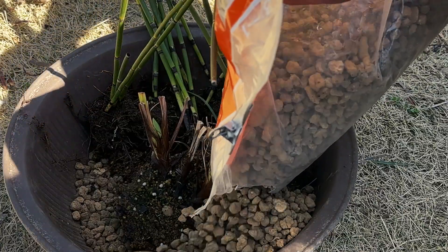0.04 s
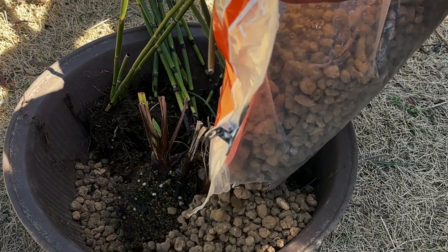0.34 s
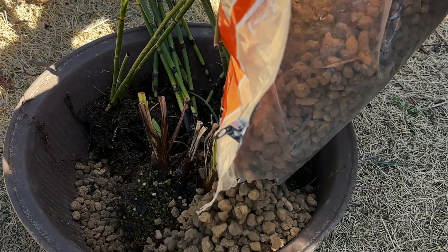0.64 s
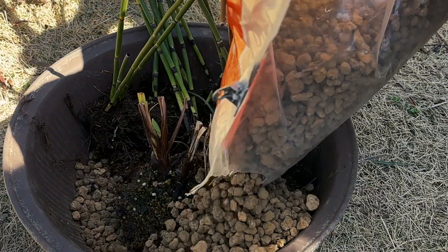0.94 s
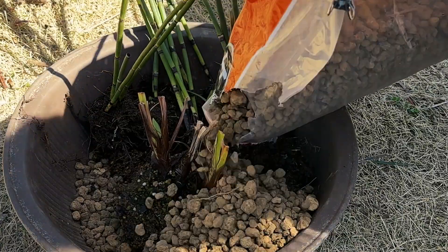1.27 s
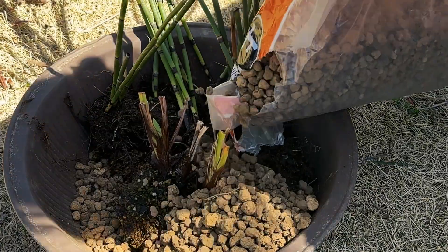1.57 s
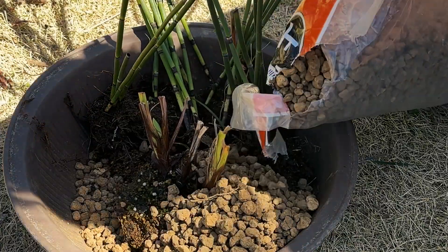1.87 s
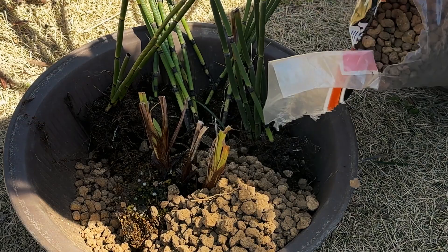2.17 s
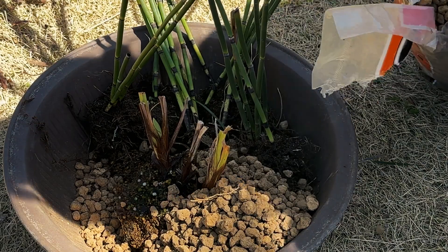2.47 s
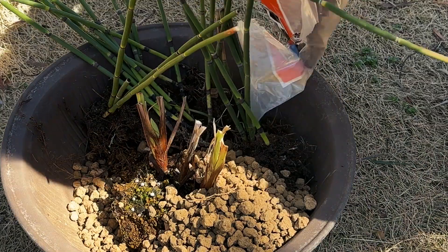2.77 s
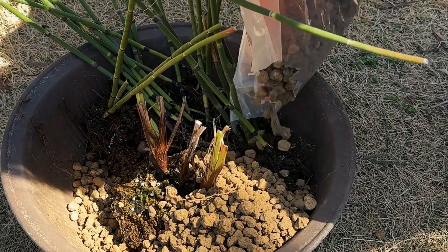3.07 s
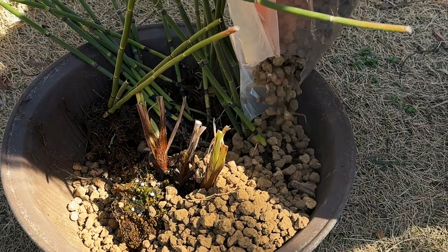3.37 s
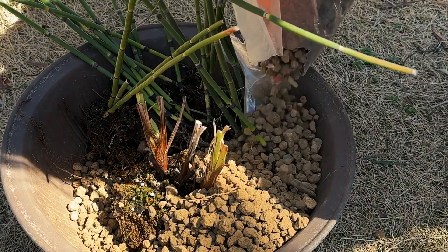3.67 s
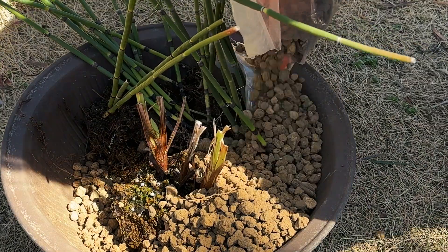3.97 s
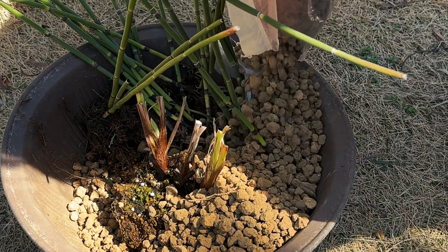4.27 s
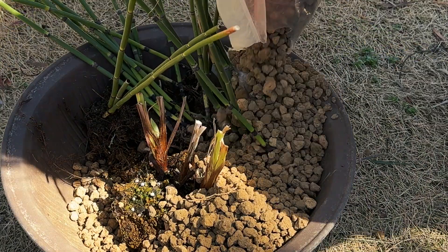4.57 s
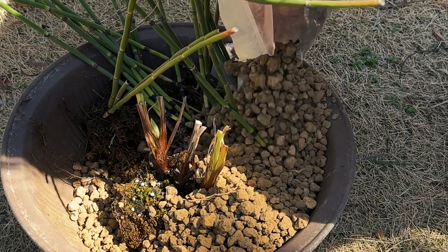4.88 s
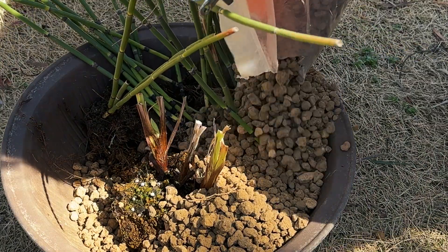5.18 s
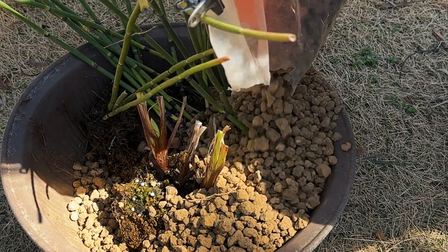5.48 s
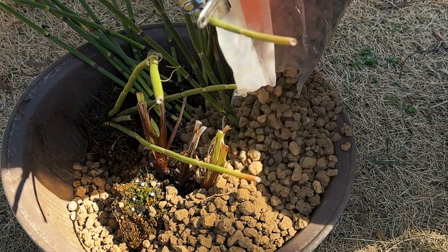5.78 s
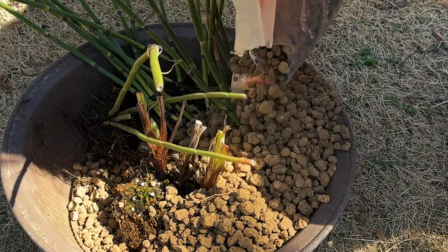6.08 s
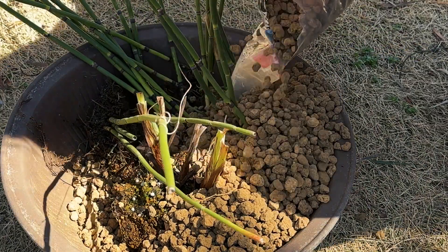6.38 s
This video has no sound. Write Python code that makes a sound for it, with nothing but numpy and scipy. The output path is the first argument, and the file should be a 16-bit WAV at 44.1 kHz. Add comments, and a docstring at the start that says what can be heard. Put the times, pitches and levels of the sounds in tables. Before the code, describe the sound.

Dry clay granules are poured from a plastic bag into a large flower pot, outdoors, close to the microphone. During the first second there is only a light trickle, with a few separate knocks and crinkles. From about 1.1 to 1.7 seconds handfuls tumble out, clacking sharply while the bag snaps and scrunches. Smaller rattling spills and crackles follow until 2.7 seconds. At 2.8 seconds a load drops at once, thudding softly on soil, and continues as a steady, fluttering patter on the growing heap, with faint hissing grit and tiny ringing grazes. The knocking turns hollower around 4 seconds. From about 5 seconds the stream thins to small clinks, with a very faint scrape of a plant stem on the bag and a crinkle near 5.6 seconds. Stray granules click until about 6.5 seconds. A light breeze rumbles softly on the microphone underneath.

```python
"""Baked clay granules pour from a plastic bag into a big flower pot, outdoors, close to the microphone.
Each impact excites a damped vibration: granules clack together, thud on bare soil, then patter on the
growing heap, and the pot scatters the sound. The bag snaps and crinkles as its creases buckle.
Friction makes grit hiss down the film and a stem scrape along it; a few granules graze a ringing edge.
Behind it all a light breeze sways on the microphone."""
import sys
import numpy as np
from scipy import signal
from scipy.fft import rfft, irfft, next_fast_len
from scipy.io import wavfile
from scipy.ndimage import uniform_filter1d

SR = 44100
rng = np.random.default_rng(int(sys.argv[2]) if len(sys.argv) > 2 else 0)


def store_wav(level_fs):
    """Save 16-bit WAV to argv[1]."""
    pcm = np.round(np.clip(np.atleast_2d(level_fs), -1, 1) * 32767)
    wavfile.write(sys.argv[1], SR, pcm.T.astype(np.int16))


N = 287973
TOP_HZ = 16200

# Spectra of impacts on soil, on the heap, on clay and of grit: (frequency [Hz], level [dB])
SOIL_SPECTRUM = [(40, -3), (120, -3.5), (220, -4), (400, 0.5), (600, 4), (1000, 0.5), (3000, -39)]
HEAP_SPECTRUM = [(250, -22), (470, -11), (590, 0), (690, -3), (870, 1), (1010, -4), (1170, -13),
                 (1400, -12), (2500, -20), (6000, -40)]
CLAY_SPECTRUM = [(400, -18), (1100, -7), (1400, -1), (1900, -3), (2650, 0), (3200, -4), (4700, -5),
                 (5400, -11), (12000, -26)]
GRIT_SPECTRUM = [(2000, -6), (3600, 2.5), (4600, 0), (5400, -3.5), (6700, 1.5), (8000, -1), (10500, -0.5),
                 (12500, -4), (16000, -31)]
# Gain of each impact sound relative to the flow:
# (in a spill [dB], poured on soil [dB], poured on the heap [dB], weight of hardness [ratio])
THUD_MIX = (0.46, 3.7, -11, -6)
KNOCK_MIX = (-3, -7, -5, -4.5)
CLACK_MIX = (0.57, 0.13, -1.3, 0.76)
TICK_MIX = (-13, -11.5, -7.5, 3)
HOLLOW_DB, HOLLOW_S, HOLLOW_WIDTH_S = 8, 4.12, 0.75  # knocks swell as the heap climbs the pot's wall
# Grit sliding down the film as the bag tilts: (time [s], duration [s], level [dB])
GRIT_SLIDES = [(0.0, 0.032, -77), (.56, 0.028, -75.5), (1.345, 0.019, -64), (2.59, 0.086, -73.5),
               (3.3, 0.12, -74), (3.48, 0.3, -77.5), (6.305, 0.02, -75)]


def granules():
    """Impact excitation: each collision gives a thud in soil, a hollow knock, a dry clack and a tick."""
    poured, cover = pour()
    levels = []
    for spill_db, soil_db, heap_db, hardness_weight in (THUD_MIX, KNOCK_MIX, CLACK_MIX, TICK_MIX):
        spill_power = amp(spill_db) ** 2 * spills(hardness_weight)
        pour_power = amp(soil_db + (heap_db - soil_db) * cover) ** 2 * poured
        levels.append(np.sqrt(spill_power + pour_power))
    thud_level, knock_level, clack_level, tick_level = levels
    hollow = amp(HOLLOW_DB * np.exp(-((np.arange(N) / SR - HOLLOW_S) / HOLLOW_WIDTH_S) ** 2))
    sliding = np.sqrt(swells(GRIT_SLIDES, attack_s=0.012, release_s=0.12) + amp(-84.5) ** 2)
    hits = collisions(spills(0), poured, spread_db=4.0, candidates=12000)
    thuds = impacts(hits, SOIL_SPECTRUM, pitch_hz=349, octaves=0.58, cycles=7.8, vary_db=2.5,
                    scatter_db=-6.5, scatter_t60=0.044, slide_db=-8, samples=700)
    knocks = impacts(hits, HEAP_SPECTRUM, pitch_hz=887, octaves=0.37, cycles=14, vary_db=5,
                     scatter_db=6, scatter_t60=0.043, slide_db=-17.5, samples=520)
    clacks = impacts(hits, CLAY_SPECTRUM, pitch_hz=2147, octaves=0.57, cycles=14.3, vary_db=2.5,
                     scatter_db=-4, scatter_t60=0.038, slide_db=-31, samples=380)
    grit = impacts(hits, GRIT_SPECTRUM, pitch_hz=7040, octaves=0.59, cycles=14, vary_db=4.5,
                   scatter_db=3, scatter_t60=0.012, slide_db=1.5, samples=150)
    rattle = in_pot(clack_level * clacks + np.hypot(tick_level, sliding) * grit, wet_db=-11, t60=0.03)
    return thud_level * thuds + knock_level * hollow * knocks + rattle


POUR_S, POUR_ATTACK_S, COVER_S = 2.79, 0.013, 0.71  # COVER_S: time scale of burying the soil
DUMP_DB, DUMP_HOLD_S, DUMP_FALL_DB_PER_S = -59, 0.18, 40  # the load at the mouth drops at once
STREAM_DB, STREAM_HOLD_S, STREAM_FALL_DB_PER_S = -68, 1.98, 8.5  # steady until the bag is eased back
CLUMP_DB = 1.33
# Flutter of the stream as granules leave in clumps: (modulation frequency [Hz], level [dB])
CLUMP_SPECTRUM = [(2, -6), (6, 0), (14, -2), (30, -14), (80, -50)]


def pour():
    """Granular flow: a dump and a stream add in power. Returns that power and the share of soil buried."""
    age = np.maximum(np.arange(N) / SR - POUR_S, 0)
    dump = amp(DUMP_DB - DUMP_FALL_DB_PER_S * np.maximum(age - DUMP_HOLD_S, 0))
    stream = amp(STREAM_DB - STREAM_FALL_DB_PER_S * np.maximum(age - STREAM_HOLD_S, 0))
    clumps = amp(CLUMP_DB * np.clip(noise(CLUMP_SPECTRUM), -2, 2))
    power = np.minimum(age / POUR_ATTACK_S, 1) ** 2 * (dump ** 2 + (clumps * stream) ** 2)
    cover = 1 - np.exp(-(age / COVER_S) ** 2)
    return power, cover


TRICKLE_DB = -82  # stray granules never quite stop
# Handfuls shaken out; positive hardness is clay on clay, negative is clay on soil:
# (time [s], duration [s], level [dB], hardness [dB])
HANDFULS = [(0.0, 0.055, -69, 0.5), (.1, 0.018, -74.5, 4), (.52, 0.056, -73, -0.5), (.97, 0.22, -76.5, -1),
            (1.07, 0.062, -78, 6), (1.119, 0.069, -61, 0), (1.214, 0.13, -63.5, 0), (1.346, 0.1, -63, -0.3),
            (1.494, 0.034, -61.5, -0.2), (1.575, 0.0095, -66, 0), (1.65, 0.027, -78.5, -2),
            (1.746, 0.017, -69, -1), (1.806, 0.04, -70, -0.5), (1.885, 0.095, -72, 0),
            (2.029, 0.034, -68, 0.5), (2.1, 0.098, -68, -0.1), (2.21, 0.055, -67, -0.5),
            (2.345, 0.039, -77, -2.5), (2.43, 0.075, -74, -1), (2.525, 0.072, -64.5, 0.2),
            (2.645, 0.044, -63.5, 1.5), (3.28, 0.019, -65, 0), (3.365, 0.054, -65, 0),
            (3.67, 0.095, -67.5, 1), (6.05, 0.031, -79, -0.5), (6.425, 0.043, -72.5, -0.5)]


def spills(hardness_weight):
    """Incoherent addition: the powers of the handfuls and of a steady trickle sum."""
    rows = [(s, length, db + hardness_weight * hard_db) for s, length, db, hard_db in HANDFULS]
    return swells(rows, attack_s=0.0092, release_s=0.19) + amp(TRICKLE_DB) ** 2


SPILL_HITS_PER_S, POUR_HITS_PER_S, REFERENCE_FLOW_DB, RATE_DOUBLES_DB = 600, 750, -68, 6


def collisions(spilled, poured, spread_db, candidates):
    """Poisson process: more flow brings more collisions, each carrying a smaller share of it."""
    flow = spilled + poured
    base_rate = (SPILL_HITS_PER_S * spilled + POUR_HITS_PER_S * poured) / flow
    rate = base_rate * 2 ** ((10 * np.log10(flow) - REFERENCE_FLOW_DB) / RATE_DOUBLES_DB)
    when = rng.integers(0, N, candidates)
    happens = rng.random(candidates) < rate[when] * N / SR / candidates
    strength = amp(spread_db * np.clip(rng.standard_normal(candidates), -2, 2))
    return when, happens * strength / np.sqrt(rate[when])


def impacts(hits, spectrum, pitch_hz, octaves, cycles, vary_db, scatter_db, scatter_t60, slide_db,
            samples):
    """Superposition: damped rings, their scatter around the pot and sliding noise sum to an rms of 1."""
    when, strength = hits
    heard = strength > 0
    pitch, share, sign = np.clip(rng.standard_normal((len(when), 3)), -2, 2)[heard].T
    when, strength = when[heard], strength[heard] * amp(vary_db * share) * np.sign(sign)
    t = np.arange(samples) / SR
    hz = np.minimum(pitch_hz * 2 ** (octaves * pitch), TOP_HZ)[:, None]
    each_ring = strength[:, None] * np.sin(2 * np.pi * hz * t) * decay(t, cycles / hz)
    rings = np.bincount((when[:, None] + np.arange(samples)).ravel(), each_ring.ravel(), N)[:N]
    energy_decay = decay(np.arange(SR // 20) / SR, scatter_t60) ** 2
    energy = signal.fftconvolve(np.bincount(when, strength ** 2, N), energy_decay)[:N]
    scatter = unit(np.sqrt(np.abs(energy)) * rng.standard_normal(N))
    stream = unit(coloured(rings, spectrum)) + amp(scatter_db) * unit(coloured(scatter, spectrum))
    stream += amp(slide_db) * noise(spectrum)
    # the power is held even over longer stretches
    power = uniform_filter1d(uniform_filter1d(stream ** 2, size=1500), size=1500)
    return stream / np.sqrt(np.abs(power) + 1e-12)


def in_pot(x, wet_db, t60):
    """Reverberation: quick reflections between the walls of the pot follow the direct sound."""
    t = np.arange(SR // 20) / SR
    out, hop = x.copy(), SR // 2
    for start in range(0, len(x), hop):  # the paths change as the bag moves
        tail = rng.standard_normal(len(t)) * decay(t, t60)
        reflections = signal.fftconvolve(x[start:start + hop], tail / np.linalg.norm(tail))
        add(out, start / SR, amp(wet_db) * reflections)
    return out


KNOCK_CYCLES, GIVE_S, SECOND_TOUCH_DB = 8.5, 0.002, -9
# Single big granules landing: (time [s], level [dB], nominal frequency [Hz])
BIG_GRANULES = [(.455, -47, 1320), (.547, -62, 844), (.739, -43.5, 1710), (1.093, -56, 686),
                (1.316, -51, 406), (1.372, -51.5, 164), (1.495, -53, 500), (1.517, -51, 1520),
                (1.535, -46, 1300), (1.659, -45, 1400), (1.894, -47, 900), (2.219, -49, 1070),
                (2.349, -47, 756), (2.354, -46.5, 1340), (2.357, -63, 487), (2.482, -66, 417),
                (2.577, -49.5, 820), (2.667, -46, 1480), (2.675, -47, 1470), (2.809, -45, 710),
                (2.845, -48, 393), (3.04, -47, 640), (3.383, -55, 795), (3.465, -51, 846),
                (3.686, -55, 780), (3.865, -51, 825), (3.978, -44.5, 910), (4.062, -57, 810),
                (4.11, -47, 880), (4.165, -48.5, 905), (4.302, -67, 820), (4.378, -56, 895),
                (4.541, -50, 875), (4.632, -49.5, 830), (5.285, -49, 1310), (6.078, -55, 870),
                (6.198, -61, 956), (6.23, -61, 398), (6.323, -63.5, 653), (6.37, -54.5, 940)]


def landings():
    """Inelastic impact: a big granule knocks twice in two modes; its rough skin crunches into the heap."""
    out, t = np.zeros(N), np.arange(SR // 25) / SR
    onset = 1 - decay(t, GIVE_S)  # porous clay gives a little first
    for s, db, hz in BIG_GRANULES:
        for delay, touch_db in ((0, 0), (rng.uniform(0.00248, 0.00497), SECOND_TOUCH_DB)):
            pitch = hz * rng.uniform(0.92, 1.08)
            knock = mode(t, pitch, KNOCK_CYCLES / pitch)
            partial = mode(t, pitch * rng.uniform(1.63, 2.1), 5 / pitch)
            add(out, s + 0.00068 + delay, amp(db + touch_db + 4.5) * onset * (knock + amp(-4) * partial))
        crunch = burst(t, CLAY_SPECTRUM, 0.02) * (1 - decay(t, 0.037))
        add(out, s - 0.002, amp(db - 17.5) * crunch)
    return in_pot(out, wet_db=-4, t60=0.029)


# Hard granules striking each other: (time [s], direct peak level [dB], frequency [Hz])
HARD_CONTACTS = [(0.947, -52, 2170), (1.0625, -46.5, 2300), (1.084, -51, 2700), (1.094, -40, 1840),
                 (1.1092, -39, 1480), (1.1344, -38, 2920), (1.217, -45, 1970), (1.3226, -37, 2610),
                 (1.351, -39, 2600), (1.368, -39, 3100), (1.379, -40.5, 2500), (1.397, -42, 1850),
                 (1.403, -40, 2700), (1.416, -40, 2370), (1.4324, -46.5, 2900), (1.4482, -40, 2880),
                 (1.459, -54, 2100), (1.937, -48.5, 1840), (2.1491, -40, 1940), (2.266, -44, 1910),
                 (2.421, -55, 1630), (2.576, -46, 2000), (2.9126, -36.5, 3230), (2.957, -42, 2600),
                 (2.976, -47, 3400), (3.041, -44.5, 2330), (3.0614, -43, 1970), (3.093, -46, 3200),
                 (3.111, -47, 2230), (3.2192, -46, 2100), (3.289, -43, 2320), (3.4655, -41.5, 2180),
                 (3.517, -49, 2060), (3.552, -47, 3500), (3.688, -47, 1780), (3.743, -46, 2710),
                 (3.919, -51, 3640), (4, -62, 1590), (4.1127, -50, 1760), (4.2446, -51, 3470),
                 (4.287, -54, 1860), (4.529, -53, 1740), (4.712, -51.5, 1700), (4.738, -49, 1460),
                 (5.08, -54, 1890), (5.287, -48, 2250), (5.424, -54, 1910), (5.53, -56, 1950),
                 (6.1317, -57, 2100), (6.1542, -60, 1820), (6.2016, -60, 2120), (6.23, -51, 2250),
                 (6.4256, -57, 2450), (6.476, -49, 1450)]


def clicks():
    """Hard impact: a brief contact gives a broadband crack and three partials that last 13 cycles."""
    out, t = np.zeros(N), np.arange(SR // 50) / SR
    for s, db, hz in HARD_CONTACTS:
        partials_hz = hz * np.array([1, rng.uniform(0.585, 0.66), rng.uniform(1.0, 1.9)])[:, None]
        ring = amp([0, -7, -5]) @ mode(t, partials_hz, 13 / partials_hz)
        crack = burst(t, [(500, -22), (2500, 5), (7000, -13), (15000, -19)], t60=0.005)
        click = ring + amp(-2) * crack
        add(out, s, amp(db) * click / np.abs(click).max())
    return in_pot(out, wet_db=-1.5, t60=0.024)


# Small, well-baked granules clinking as the stream thins: (time [s], level [dB], frequency [Hz])
SMALL_GRANULES = [(5.355, -56, 2700), (5.392, -56, 2700), (5.585, -62, 2950), (5.593, -62, 2850),
                  (5.7222, -63, 2750), (5.7492, -57, 2840), (5.8858, -69, 3090), (5.9066, -62, 3220),
                  (5.924, -64, 2710), (6.0056, -66, 2970), (6.03, -63, 3190)]


def clinks():
    """Free vibration: one clear note outlasts a higher partial and the tick of the contact."""
    out, t = np.zeros(N), np.arange(SR // 25) / SR
    onset = 1 - decay(t, 0.0033)
    for s, db, hz in SMALL_GRANULES:
        note = mode(t, hz, t60=0.024)
        partial = mode(t, hz * rng.uniform(1.16, 1.53), t60=0.013)
        tick = burst(t, CLAY_SPECTRUM, t60=0.0091)
        add(out, s, amp(db) * onset * (note + amp(0.5) * partial + tick))
    return out


# Creases of the bag snapping through: (time [s], level [dB], relative level of flap and puff [dB])
CREASE_SNAPS = [(0.0423, -52.5, -2), (0.3542, -61.5, 6), (0.4525, -42, -12), (0.7007, -53.5, -8),
                (1.1487, -41.5, -1.5), (1.2308, -36.5, -5), (1.266, -38, -9), (1.315, -40.5, -9),
                (1.3438, -38, -21), (1.3495, -34, -28), (1.3953, -35, -14), (1.412, -33, -23),
                (1.447, -40.5, -11), (1.4876, -37.5, -10), (1.6115, -31.5, -18), (1.6329, -49.5, -2.5),
                (1.8, -39.5, -9), (2.006, -53, 2.5), (2.369, -50.5, -2.5), (2.4371, -45.5, -1),
                (2.6956, -43.5, -5.5), (2.792, -47, -6), (2.8635, -39, -25), (2.9113, -38.5, -33),
                (3.932, -54, -12), (4.527, -54, -3), (5.5592, -43, -20), (6.154, -65, 0),
                (6.425, -62.5, 5.5)]
# Response of the plastic film: (frequency [Hz], gain [dB])
FILM_RESPONSE = [(100, -12.5), (1000, -1.5), (2800, 6), (5000, 4), (7000, 7), (11000, 1.5), (13500, -3.5),
                 (16000, -28)]
# Rumble of the heavy bag heaved in the hands: (time [s], duration [s], level [dB])
BAG_HEAVES = [(0.0, 0.24, -81), (1.14, 0.27, -69), (2.73, 0.22, -66), (6.05, 0.68, -74)]


def bag():
    """Snap-through buckling: a crease emits a pulse, the sheet shivers and flaps, the full bag puffs."""
    out, t = np.zeros(N), np.arange(SR // 25) / SR
    pulse_time = t / 0.000045
    pulse = (1 - pulse_time) * np.exp(-pulse_time)
    flap_spectrum = [(150, -52), (700, 10.5), (1500, -1.5), (3000, -2.5), (6000, -14.5), (15000, -57)]
    for s, db, flap_db in CREASE_SNAPS:
        shiver = rng.standard_normal(len(t)) * (decay(t, 0.0082) + amp(-15) * decay(t, 0.033))
        flap = burst(t, flap_spectrum, t60=0.023) * (1 - decay(t, 0.0022))
        puff = mode(t, 135 * amp(rng.standard_normal()), t60=0.018)
        body = flap + amp(4.5) * puff
        add(out, s + 0.001248, amp(db + 4.5) * pulse + amp(db - 11) * shiver + amp(db + flap_db) * body)
        for delay in rng.uniform(-0.00047, 0.0069, size=3):  # neighbouring creases give way too
            add(out, s + 0.0015 + delay, amp(db - 13) * pulse)
    heft = np.sqrt(swells(BAG_HEAVES, attack_s=0.028, release_s=0.86))
    rumble = noise([(30, -1), (62, 0.5), (130, -8.5), (200, -29), (400, -53)])
    return coloured(out, FILM_RESPONSE) + heft * rumble


# The film squeezed against the granules: (time [s], duration [s], level [dB])
FILM_SQUEEZES = [(1.11, .03, -65), (1.14, 0.043, -62.5), (1.316, 0.0093, -58), (1.347, .01, -57),
                 (1.366, .016, -61), (1.396, 0.019, -54), (1.453, 0.0072, -58), (1.483, 0.0053, -59),
                 (1.512, 0.0083, -55), (1.528, 0.014, -55), (1.672, 0.0087, -64.5), (1.803, 0.0052, -58),
                 (1.827, 0.025, -66), (2.04, 0.0045, -72), (2.059, 0.0065, -63.5), (2.16, 0.0075, -56),
                 (2.19, 0.0087, -59.5), (2.238, 0.0068, -57.5), (2.262, 0.0059, -61.5), (2.278, 0.016, -65),
                 (2.354, 0.0046, -60), (2.584, .005, -60), (2.665, 0.018, -59.5), (2.864, .005, -65),
                 (2.912, .005, -58), (2.955, 0.0049, -67), (2.974, 0.0045, -61), (5.56, .007, -65),
                 (6.076, .012, -67), (6.425, 0.021, -73), (6.472, .008, -80)]


def scrunches():
    """Shot noise: thousands of tiny creases a second give way and merge into a fine crackle."""
    creases = rng.standard_normal(N) * (rng.random(N) < 4000 / SR)
    spectrum = [(200, -31), (800, 2), (1500, 5), (3200, 4), (5000, -7), (10000, -18.5), (16000, -58)]
    crackle = unit(coloured(creases, spectrum))
    return np.sqrt(swells(FILM_SQUEEZES, attack_s=0.0019, release_s=0.011)) * crackle


EDGE_VARY_DB, EDGE_DETUNE = 1, 0.002  # each contact point favours other modes and shifts them a little
# Modes of a hard, ringing edge: (frequency [Hz], level [dB], 60 dB decay time [s])
EDGE_MODES = [(2700, 3.5, 0.075), (3710, 2, 0.08), (4100, -2, 0.055), (4440, -1, 0.06), (4680, 5, 0.06),
              (4770, -1, 0.045), (5570, -3, 0.06), (6290, -10, 0.06), (6530, -7, 0.05), (7410, -5, 0.05),
              (8400, -7, 0.04)]
# Granules skidding along that edge: (time [s], level [dB], duration [s])
EDGE_SKIDS = [(.01, -68.5, 0.035), (0.096, -75, 0.056), (0.189, -70, 0.017), (3.218, -54, 0.0032),
              (3.291, -62.5, 0.045), (3.34, -80.5, 1.2), (3.348, -65, 0.017), (3.399, -62, 0.013),
              (3.453, -63.5, 0.0079), (3.547, -67, 0.0079), (3.613, -66.5, 0.023), (3.733, -64.5, 0.015),
              (3.929, -62.5, 0.0045), (4.381, -61, 0.0086)]


def grazes():
    """Forced vibration: a run of tiny contacts keeps the modes of the edge ringing."""
    out, t = np.zeros(N), np.arange(SR // 8) / SR
    for s, db, length in EDGE_SKIDS:
        contacts = rng.standard_normal(2 * SR)[:int(length * SR)] ** 3
        ring = sum(amp(level + rng.normal(0, EDGE_VARY_DB)) * mode(t, hz * rng.normal(1, EDGE_DETUNE), t60)
                   for hz, level, t60 in EDGE_MODES)
        skid = signal.fftconvolve(contacts, ring)
        add(out, s, amp(db) * skid * np.sqrt(length * SR) / (np.linalg.norm(skid) + 1e-12))
    return out


RUB_END_HZ, RUB_SLOWS_S = 2544, 0.07
# A stem rubbing along the bag: (time [s], duration [s], level [dB], starting frequency [Hz])
STEM_RUBS = [(5.25, .13, -72.5, 4800), (5.57, 0.058, -78, 3100), (5.84, 0.08, -78.5, 3600)]


def stem():
    """Stick-slip friction: a stem scrapes faintly on the film, sinking in pitch as the slide slows."""
    t, pitch_hz = np.arange(N) / SR, np.full(N, float(RUB_END_HZ))
    for s, _, _, hz in STEM_RUBS:
        add(pitch_hz, s, (hz - RUB_END_HZ) * np.exp(-t / RUB_SLOWS_S))
    jitter_octaves = 0.05 * noise([(10, -0.5), (60, -0.5), (120, -64)])
    phase = 2 * np.pi * np.cumsum(pitch_hz * 2 ** jitter_octaves) / SR
    chatter = noise([(30, 0), (150, 3), (450, 0), (800, -8), (1500, -30), (3000, -60)])
    slips = amp(3.5 * np.clip(noise([(10, -26), (40, -5), (80, -7), (200, -55)]), -2, 2))
    pressure = np.sqrt(swells([row[:3] for row in STEM_RUBS], attack_s=0.0082, release_s=0.15))
    return pressure * unit(slips * chatter * np.sin(phase))


AIR_DB, LULL_DB = -71, -53.5
# Spectra of outdoor air and of wind buffeting the microphone: (frequency [Hz], level [dB])
AIR_SPECTRUM = [(30, -9), (60, 4), (110, -1.5), (200, -2), (400, -0.5), (1000, -5), (1700, -9),
                (3500, -15.5), (7000, -27.5), (12000, -37), (15000, -85)]
BUFFET_SPECTRUM = [(1, -2), (2.5, 1), (4, -2), (8, -7), (14, -16), (20, -24), (28, -31.5), (42, -39),
                   (60, -47), (100, -59), (220, -90)]
# Gusts on the microphone: (time [s], duration [s], level [dB])
BREEZE_GUSTS = [(0.0, 0.69, -50), (1.6, 0.19, -43.5), (1.95, 0.33, -37.5), (2.52, 1.03, -40.5),
                (3.55, 0.35, -37.5), (3.95, 0.19, -34), (4.85, 0.44, -39.5), (6.05, 1.05, -45)]


def breeze():
    """Turbulence: slow pressure fluctuations swell on the microphone, over faint outdoor air."""
    wind_level = np.sqrt(swells(BREEZE_GUSTS, attack_s=0.0715, release_s=0.5) + amp(LULL_DB) ** 2)
    return amp(AIR_DB) * noise(AIR_SPECTRUM) + wind_level * noise(BUFFET_SPECTRUM)


def amp(db):
    """Amplitude ratio of a level in decibels."""
    return 10 ** (np.asarray(db) / 20)


def unit(x):
    """Normalisation to an rms of 1."""
    return x / np.sqrt(np.mean(x ** 2) + 1e-20)


def add(track, s, sound):
    """Superposition of a sound on a track, from s seconds on."""
    start = max(0, round(s * SR))
    part = track[start:start + len(sound)]
    part += sound[:len(part)]


def decay(t, t60):
    """Exponential decay of 60 dB in t60 seconds."""
    return np.exp(-np.log(1000) * t / t60)


def mode(t, hz, t60):
    """Damped harmonic oscillation."""
    return np.sin(2 * np.pi * hz * t) * decay(t, t60)


def burst(t, spectrum, t60):
    """Exponentially damped, filtered noise."""
    return unit(coloured(rng.standard_normal(len(t)), spectrum)) * decay(t, t60)


def swells(rows, attack_s, release_s):
    """Power envelope of events that rise, hold and decay: (time [s], duration [s], level [dB])."""
    power = np.zeros(N)
    for s, length, db in rows:
        t = np.arange(int((length + release_s) * SR)) / SR
        envelope = np.minimum(t / attack_s, 1) * decay(np.maximum(t - length, 0), release_s)
        add(power, s, (amp(db) * envelope) ** 2)
    return power


def gain_at(spectrum, size):
    """Magnitude response on an FFT grid, interpolated in log frequency: (frequency [Hz], level [dB])."""
    hz, db = np.transpose(spectrum)
    return amp(np.interp(np.log(np.fft.rfftfreq(size, 1 / SR) + 1), np.log(hz + 1), db))


def coloured(x, spectrum, size=2048):
    """Minimum-phase filtering: the response is causal, so attacks stay sharp."""
    cepstrum = irfft(np.log(gain_at(spectrum, size)))
    cepstrum[1:size // 2] *= 2
    cepstrum[size // 2 + 1:] = 0
    return signal.fftconvolve(x, irfft(np.exp(rfft(cepstrum))))[:len(x)]


def noise(spectrum):
    """Stationary noise with a given spectral shape and an rms of 1."""
    size = next_fast_len(N)
    return unit(irfft(rfft(rng.standard_normal(size)) * gain_at(spectrum, size), size)[:N])


def scene():
    """Linear superposition: all sources sum at one point just above the pot."""
    clay = granules() + landings() + clicks() + clinks()
    return (clay + bag() + scrunches() + grazes() + stem() + breeze())[None]


def record(dry):
    """Band limiting: a steep low-pass filter removes the highest treble."""
    return signal.sosfilt(signal.ellip(10, 0.1, 90, TOP_HZ, fs=SR, output="sos"), dry)


dry = scene()
out = record(dry)
store_wav(out)
```